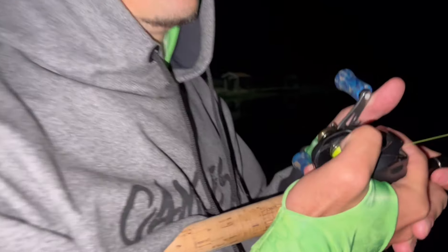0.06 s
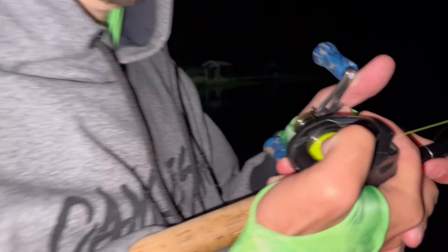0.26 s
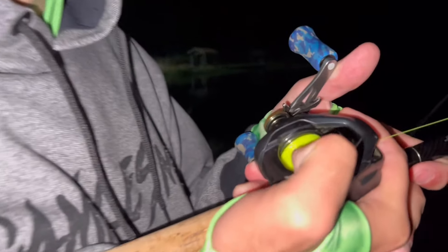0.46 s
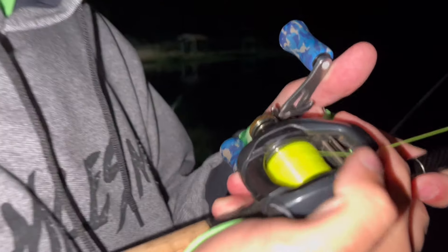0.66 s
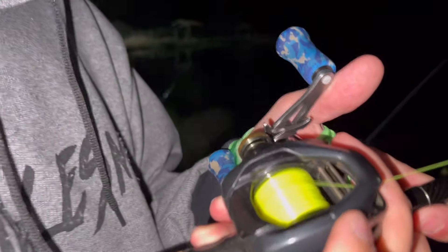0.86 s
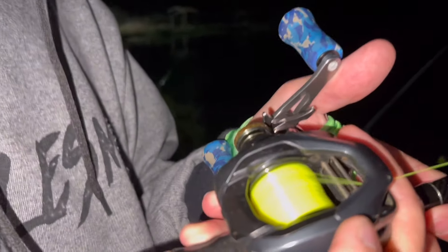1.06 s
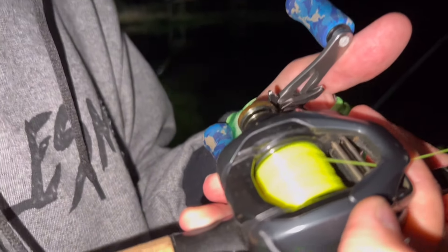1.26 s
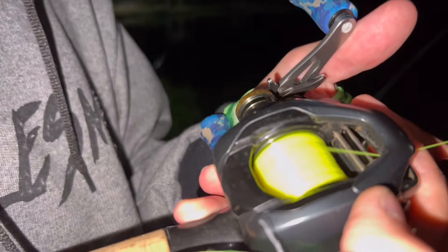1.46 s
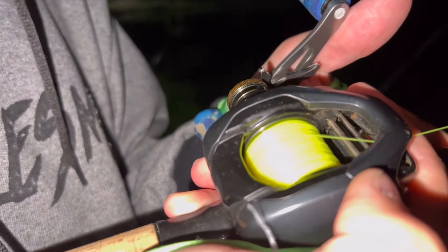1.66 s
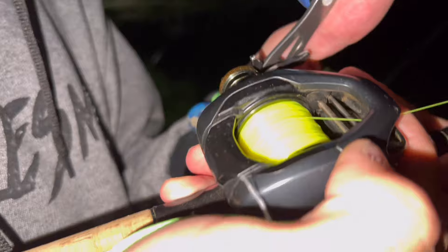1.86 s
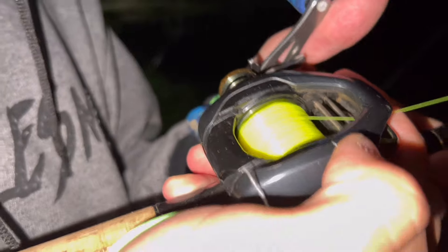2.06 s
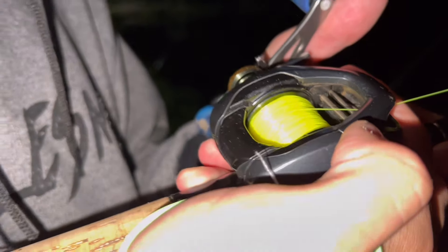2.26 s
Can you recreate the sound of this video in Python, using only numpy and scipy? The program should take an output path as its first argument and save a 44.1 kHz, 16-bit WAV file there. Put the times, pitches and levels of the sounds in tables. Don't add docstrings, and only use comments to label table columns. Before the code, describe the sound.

Fishing reel drag being pulled, heard very close outdoors. Light wind rumble and faint hiss throughout. Faint ticks at 0-0.1 s, then short dry rasps about every 0.15 s, growing louder, many opening with a high thin ping. Nearly continuous snapping at 1.0-1.2 s with low falling thumps, strongest near 1.17. Rising string-like whines fill the gaps; spaced bursts at 1.29, 1.44, 1.68 and 1.97, then ringing fades.

```python
import sys
import numpy as np
from scipy import signal
from scipy.fft import rfft, irfft
from scipy.io import wavfile
from scipy.ndimage import uniform_filter1d

SR = 44100
rng = np.random.default_rng(int(sys.argv[2]) if len(sys.argv) > 2 else 0)


def master_out(mix):
    frames = np.transpose(np.atleast_2d(mix))
    ceiling = np.clip(frames, -1, 1)
    pcm = np.round(ceiling * 32767).astype(np.int16)
    wavfile.write(sys.argv[1], SR, pcm)


def invert_db(level):
    return 10 ** (np.asarray(level, dtype=float) / 20)


N = 101429


def read(points, hz):
    f, value = np.transpose(points)
    return np.interp(np.log(hz + 1), np.log(f + 1), value)


def evened(x):
    return x / np.sqrt(np.mean(x ** 2) + 1e-20)


def add(mix, s, sound):
    part = mix[round(s * SR):][:len(sound)]
    part += sound[:len(part)]


def decay(t, t60):
    return invert_db(-60 * t / t60)


def colour(x, points):
    gain = invert_db(read(points, np.fft.rfftfreq(2 * N, 1 / SR)))
    return irfft(rfft(x, 2 * N) * gain)[..., :N]


def pair(points, same):
    a, b = rng.standard_normal((2, N))
    right = same * a + np.sqrt(1 - same ** 2) * b
    return evened(colour(np.array([a, right]), points))


# [t/s, level/dB]
WIND_LEVEL = [
    (0.0, -47.5),
    (0.15, -60.5),
    (0.38, -54),
    (0.52, -46.5),
    (0.75, -50),
    (0.9, -44),
    (1.06, -53),
    (1.37, -53),
    (2.3, -56),
]
# [f/Hz, level/dB]
WIND_COLOUR = [(40, -14), (62, -1.5), (100, -8), (180, -18), (320, -28), (600, -34), (1200, -92.5)]
# [f/Hz, level/dB]
HISS_COLOUR = [(200, -2.5), (500, 2.5), (2000, 6.5), (4500, 2), (6500, -2.5), (9000, -24), (16000, -41)]


def night():
    t = np.arange(N) / SR
    waves = [np.sin(2 * np.pi * (f * t + rng.random())) / np.sqrt(f) for f in np.geomspace(4, 18, 20)]
    gust = evened(sum(waves))
    wind_db = np.interp(t, *np.transpose(WIND_LEVEL)) + 3 * gust
    hiss_db = -57.5 - 6.5 * t + gust
    return invert_db(wind_db) * pair(WIND_COLOUR, 0.5) + invert_db(hiss_db) * pair(HISS_COLOUR, 0.45)


# [f/Hz, level/dB]
CRACK_COLOUR = [(1100, -31.5), (1600, -24), (3000, -12.5), (5500, -17), (8000, -16.5), (11500, -4.5),
                (15300, -7), (16200, -6.5)]
CRACK_TAIL_T60 = .011


def cracks(count):
    t, hz = np.arange(1536) / SR, np.fft.rfftfreq(1536, 1 / SR)
    fade = decay(t, .0035) + invert_db(-11) * decay(t, CRACK_TAIL_T60)
    burst = rng.standard_normal((count, len(t))) * fade
    humps = np.sin(hz / 1300 + rng.uniform(0, 2 * np.pi, (count, 1)))
    crack = irfft(rfft(np.roll(burst, 64, axis=1)) * invert_db(read(CRACK_COLOUR, hz) + 5.5 * humps))
    loudest = uniform_filter1d(crack ** 2, size=24, axis=1).max(1)
    return np.roll(crack / np.sqrt(loudest / 2)[:, None], -44, axis=1)


# [f/Hz, level/dB, 60 dB decay t/s]
BODY_TONES = [(1450, -3, .014), (1640, -1, .013), (1850, -2, .011), (2120, 3, .017), (2230, 3, .017),
              (2950, -6, .012), (3600, -4, .012), (4800, -5, .01), (5400, -2, .01), (6800, -4, .01)]


def body_rings(count):
    t = np.arange(1536) / SR
    ring = np.zeros((count, len(t)))
    for hz, db, t60 in BODY_TONES:
        louder, sharper = rng.standard_normal((2, count, 1))
        tone = np.sin(2 * np.pi * hz * (1 + .02 * sharper) * t)
        ring += invert_db(db + 3 * louder) * decay(t, t60) * tone
    ring = signal.sosfilt(signal.butter(5, 1350, "high", fs=SR, output="sos"), ring)
    return np.roll(ring * np.minimum(t / .0006, 1), 20, axis=1)


# [start t/s, length t/s, rasp level/dB]
SLIPS = [(.01, 0.084, -54.5), (0.179, 0.06, -45.5), (0.331, 0.07, -42), (0.492, 0.064, -37.5),
         (0.641, 0.082, -37.5), (0.821, 0.062, -36.5), (0.994, 0.064, -39), (1.066, 0.12, -50.5),
         (1.16, 0.062, -40), (1.287, 0.056, -34.5), (1.438, 0.066, -37), (1.676, 0.073, -38.5),
         (1.972, 0.069, -42)]


def slipping():
    t, total = np.arange(N) / SR, np.zeros(N)
    for s, length, db in SLIPS:
        over = t - s - length
        total += (t > s) * invert_db(db - 12 * (over > 0) - 496 * np.maximum(over, 0))
    return total


def rasp(slip, crack, ring):
    out, per_s = np.zeros(N), 700
    size_db = 2.5 * np.minimum(rng.exponential(1, N), 3)
    size = (rng.random(N) < per_s / SR) * invert_db(size_db)
    which = rng.integers(0, len(crack), N)
    for k, shape in enumerate(crack + invert_db(-12) * ring):
        out += signal.oaconvolve(slip * size * (which == k), shape)[:N]
    return out


# [f/Hz, level/dB]
RUB_COLOUR = [(1150, -34.5), (1500, -17), (2200, -9.5), (4000, -20), (7200, -9), (9000, -23.5),
              (12000, -12.5), (16000, -11.5)]


def rub(slip):
    lumps = uniform_filter1d(rng.standard_normal(N), size=90)
    lumps = evened(uniform_filter1d(lumps, size=90))
    noise = evened(colour(rng.standard_normal(N), RUB_COLOUR))
    return invert_db(-10 + 5.5 * lumps) * slip ** 0.86 * noise


# [t/s, level/dB, f/Hz]
PINGS = [
    (0.013, -31.5, 6970),
    (0.1688, -35.5, 7760),
    (0.3143, -21, 7330),
    (0.4784, -27, 6950),
    (0.626, -22, 7100),
    (1.2775, -13.5, 7460),
    (1.4315, -18, 6900),
    (1.6745, -22, 7100),
    (1.962, -18.5, 7320),
]


def pings():
    out, t = np.zeros(N), np.arange(1500) / SR
    for s, db, hz in PINGS:
        burst = rng.standard_normal(len(t)) * decay(t, CRACK_TAIL_T60)
        tick = colour(np.pad(burst, (0, N - len(t))), CRACK_COLOUR)[:len(t)]
        ring = np.sin(2 * np.pi * hz * t) + np.sin(4 * np.pi * hz * t)
        ring *= invert_db(-9) * decay(t, .014) * np.minimum(t / .0008, 1)
        add(out, s, invert_db(db) * (ring + tick))
    return out


# [t/s, level/dB]
SNAPS = [(0.0484, -38), (0.0707, -38), (0.0748, -43), (0.0785, -44), (0.1101, -42), (0.1854, -32),
         (0.1944, -31), (0.197, -31), (0.2109, -29), (0.2194, -29), (0.2232, -33), (0.2268, -32),
         (0.2368, -32), (0.3348, -27), (0.3387, -28), (0.3437, -32), (0.348, -30), (0.3558, -34),
         (0.361, -31), (0.3687, -29), (0.373, -27), (0.3782, -32), (0.3863, -29), (0.3932, -29),
         (0.4034, -29), (0.4833, -18), (0.4969, -23), (0.5001, -23), (0.5087, -29), (0.5127, -21),
         (0.5172, -25), (0.5275, -25), (0.5344, -17), (0.5375, -23), (0.5433, -23), (0.5536, -18),
         (0.6412, -27), (0.6441, -30), (0.6499, -14), (0.6583, -17), (0.6639, -29), (0.6673, -14),
         (0.6715, -16), (0.6766, -18), (0.6828, -24), (0.6887, -17), (0.6947, -15), (0.7001, -17),
         (0.7068, -16), (0.7119, -26), (0.7148, -14), (0.7192, -30),
         (0.8135, -17), (0.8241, -19), (0.8304, -17), (0.8366, -10), (0.8423, -15), (0.8497, -24),
                (0.8539, -15), (0.8602, -22), (0.863, -15), (0.8675, -13), (0.8702, -20), (0.8767, -19),
                (0.888, -22), (0.8939, -19), (0.9851, -16), (0.9974, -20), (1.0015, -13), (1.0128, -25),
                (1.0155, -24), (1.0213, -16), (1.0305, -25), (1.0352, -24), (1.0389, -11), (1.0436, -20),
                (1.0507, -15), (1.0668, -11), (1.0904, -15), (1.0945, -26), (1.1111, -22), (1.1159, -10),
                (1.1409, -20), (1.1557, -27), (1.1628, -16), (1.1696, -10), (1.1772, -26), (1.181, -20),
                (1.1885, -18), (1.1937, -18), (1.1969, -25), (1.1996, -18), (1.2054, -18), (1.2166, -14),
         (1.2886, -19), (1.2925, -13), (1.2961, -12), (1.3014, -19), (1.311, -16), (1.3189, -15),
               (1.3293, -15), (1.3339, -22), (1.4412, -13), (1.4503, -20), (1.4548, -10), (1.461, -10),
               (1.467, -18), (1.4719, -10), (1.4773, -16), (1.4855, -21), (1.49, -15), (1.4957, -15),
               (1.5001, -18), (1.507, -25), (1.5127, -16),
         (1.6645, -12), (1.6821, -16), (1.6866, -16), (1.6936, -13), (1.6992, -16), (1.7021, -12),
              (1.7068, -12), (1.7121, -19), (1.7159, -20), (1.7239, -22), (1.7272, -13), (1.7317, -19),
              (1.7421, -17), (1.7461, -20), (1.7541, -19), (1.9736, -12), (1.9881, -14), (1.9935, -15),
              (1.9992, -26), (2.0042, -20), (2.0068, -10), (2.0114, -22), (2.0155, -19), (2.0224, -21),
              (2.0328, -19),
         (.4712, -41),
    (.9826, -25),
    (1.0182, -19),
    (1.0795, -30),
    (1.0846, -33),
    (1.1247, -29),
    (1.4285, -36),
    (1.7395, -20),
]
# [t/s, ring level/dB]
KNOCKS = [(.1094, -45.5), (.3133, -41.5), (.3609, -37.5), (.4795, -38.5), (.5536, -44), (.6583, -42.5),
          (.6715, -36), (.7148, -35.5), (.8135, -42.5), (.8539, -34.5), (1.0015, -30), (1.0213, -33.5),
          (1.0389, -48), (1.0507, -30.5), (1.0905, -32), (1.1409, -30), (1.2054, -37.5), (1.2166, -42.5),
          (1.6645, -45)]


def snaps(crack, ring):
    out, early = np.zeros(N), 20 / SR
    for k, (s, db) in enumerate(SNAPS):
        k %= len(crack)
        add(out, s - early, invert_db(db) * (invert_db(-2.71) * crack[k] + invert_db(-33) * ring[k]))
    for k, (s, db) in enumerate(KNOCKS):
        add(out, s - early, invert_db(db) * ring[k])
    return out


def drag():
    crack, ring, slip = cracks(24), body_rings(24), slipping()
    return rasp(slip, crack, ring) + rub(slip) + snaps(crack, ring)


# [t/s, f/Hz, climb f/Hz per s, level/dB, share of the bright peak 0-1]
SONGS = [
    (0.247, 453, 616, -67, 1),
    (.41, 439, 484, -71, 0),
    (.56, 356, 547, -63.5, 0.19),
    (.72, 355.4, 394, -62, 0.12),
    (0.899, 377.5, 360, -65.5, 0.38),
    (1.221, 380, 262, -56, 0.7),
    (1.348, 377.4, 220, -55.5, 0.78),
    (1.515, 362.7, 248, -54.5, 1),
    (1.759, 354.3, 221.6, -55.5, 0.79),
    (2.04, 349.4, 199, -58.5, 0.72),
]
# [f/Hz, level/dB]
LINE_COLOUR = [(350, -30), (1200, -20), (2200, -14), (3600, -16), (4600, -17), (5900, 0), (7200, -14),
               (14000, -17)]
# [f/Hz, 60 dB decay t/s]
LINE_T60 = [(350, .4), (2200, .7), (6000, .5), (7500, .25), (14000, .14)]


def line():
    out, order = np.zeros(N), np.arange(1, 44)[:, None]
    lead_s, climb_s, fade_s = .03, .16, 0.018
    starts = np.array([row[0] for row in SLIPS] + [N / SR + 1])
    for s, hz, climb, db, peak in SONGS:
        next_slip = starts[starts > s].min()
        t = np.arange(-lead_s, min(next_slip - s + 0.017, .5), 1 / SR)
        pitch = hz + climb * climb_s * (1 - np.exp(-t / climb_s))
        a, b = rng.standard_normal((2, len(order), 1))
        overtone_hz = order * hz
        waver_db = 3 * a + 4 * np.sin(90 * b * t + 5 * a)
        fade = decay(np.maximum(t, 0), read(LINE_T60, overtone_hz))
        level = invert_db(peak * read(LINE_COLOUR, overtone_hz) + waver_db) * fade
        tones = np.cos(2 * np.pi * order * np.cumsum(pitch) / SR + 3 * b)
        song = (level * (overtone_hz < 16000) * tones).sum(0)
        edge = np.minimum(np.minimum((t - t[0]) / lead_s, (t[-1] - t) / fade_s), 1)
        add(out, s - lead_s, invert_db(db) * edge * song)
    return out


# [t/s, level/dB]
THUMPS = [
    (1.065, -30.5),
    (1.113, -40),
    (1.168, -20.5),
    (1.334, -45),
    (1.695, -46),
]


def rod():
    out, t = np.zeros(N), np.arange(1, 4000) / SR
    first_s, stretch, lag_s = 0.0012, 1.8, -0.00099
    turns = np.log(t / first_s) / np.log(stretch)
    swell = np.clip(t / 0.0033, 0, 1) ** 3.6
    shape = np.cos(2 * np.pi * turns) * swell * decay(t, 0.14)
    for s, db in THUMPS:
        add(out, s + lag_s, invert_db(db - 2) * shape)
    return out


# [f/Hz, phase/rad]
PORT_LEAD = [(0, 0), (1800, -.1), (2600, 3.1), (3300, 4.4), (4200, 6.3), (6600, 6.2), (10050, 3.14),
             (16800, -3.0)]
# [f/Hz, level/dB]
PORT_TILT = [(300, 0), (900, 6), (1600, 5), (2200, -6), (3800, 6), (5700, -4), (7200, 3), (9500, 0)]
# [f/Hz, level/dB]
ECHO_COLOUR = [(1300, -4), (2000, 2), (2700, -8), (3500, 0), (7500, 2), (9500, -18)]


def ports(x):
    hz = np.fft.rfftfreq(2 * N, 1 / SR)
    half = np.exp(.5j * np.interp(hz, *np.transpose(PORT_LEAD))) * invert_db(.5 * read(PORT_TILT, hz))
    direct = irfft(rfft(x, 2 * N) * np.array([half, 1 / half]))[:, :N]
    t = np.arange(3000) / SR
    tail = rng.standard_normal((2, len(t))) * decay(t, .016) * (t > .001)
    tail /= np.linalg.norm(tail[0])
    echo = signal.oaconvolve(colour(x, ECHO_COLOUR)[None], tail, axes=1)[:, :N]
    return direct + invert_db(-8) * echo


def scene():
    return night() + ports(drag() + pings() + line()) + rod()


def top_cut(x):
    return signal.sosfilt(signal.butter(12, 16970, fs=SR, output="sos"), x)


def record(dry):
    low_pass = signal.firwin(101, 16100, window=("kaiser", 6), fs=SR)
    mix = signal.oaconvolve(dry, low_pass[None], "same")
    return top_cut(mix)


dry = scene()
out = record(dry)
master_out(out)
```